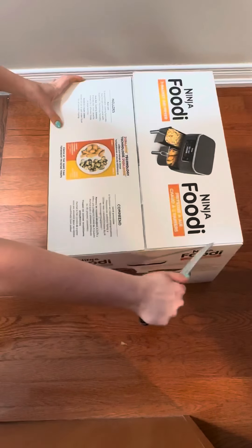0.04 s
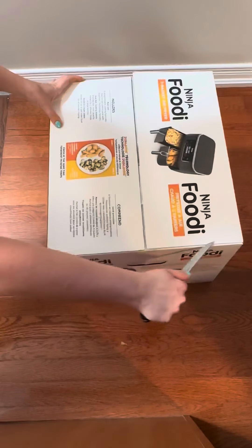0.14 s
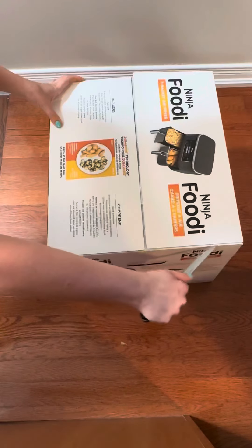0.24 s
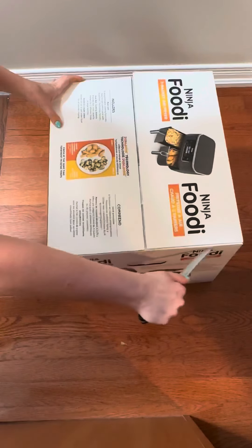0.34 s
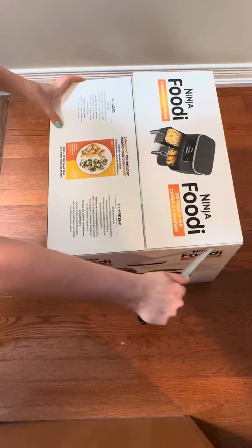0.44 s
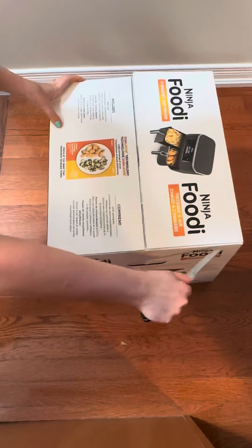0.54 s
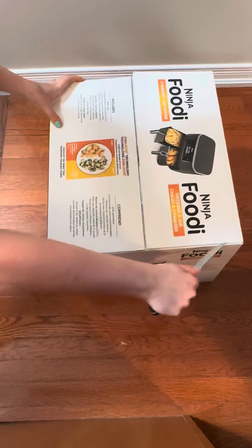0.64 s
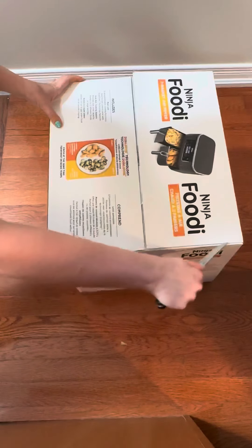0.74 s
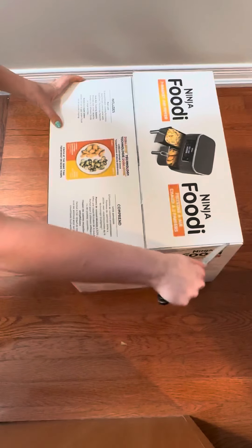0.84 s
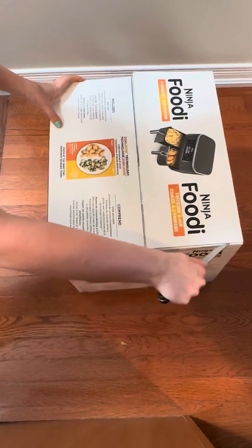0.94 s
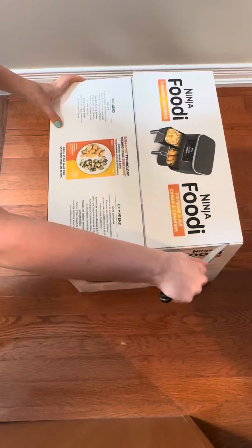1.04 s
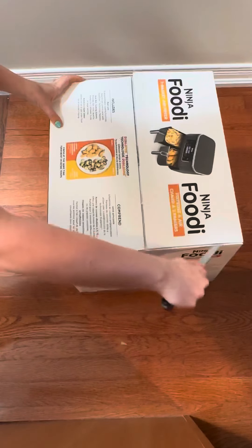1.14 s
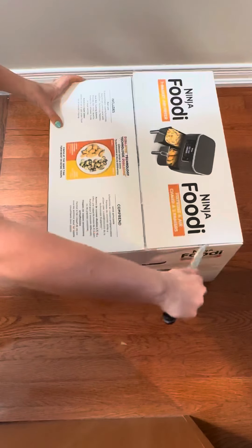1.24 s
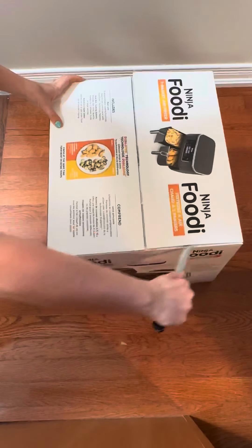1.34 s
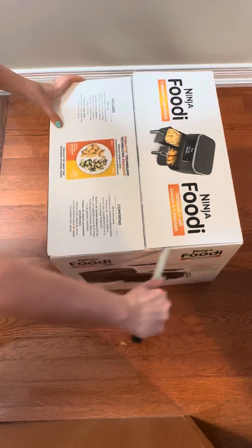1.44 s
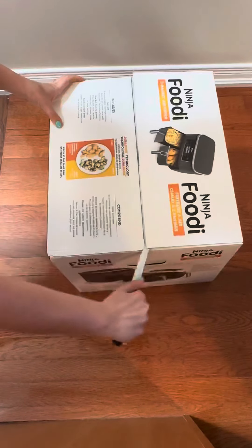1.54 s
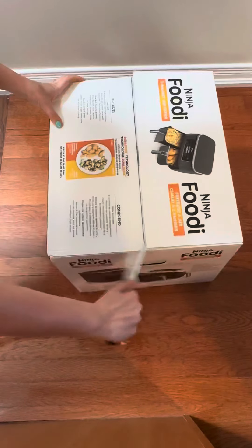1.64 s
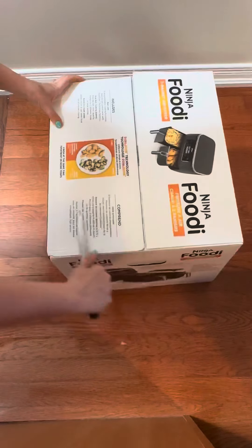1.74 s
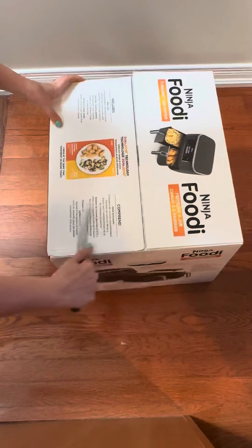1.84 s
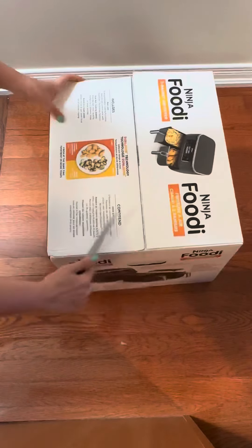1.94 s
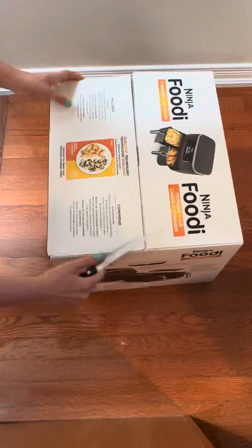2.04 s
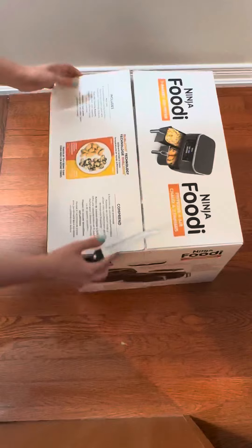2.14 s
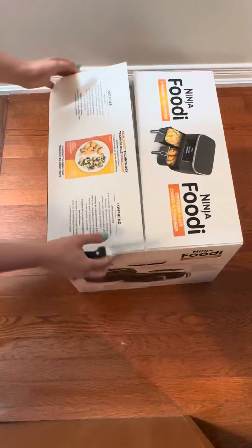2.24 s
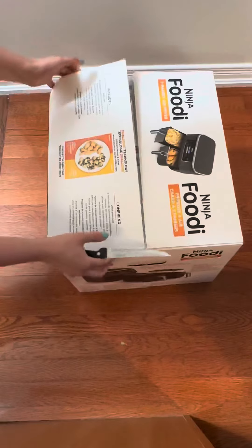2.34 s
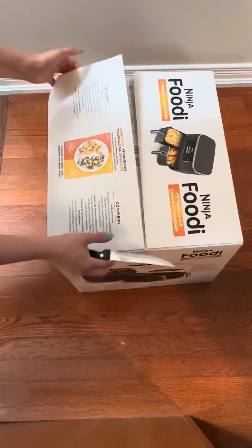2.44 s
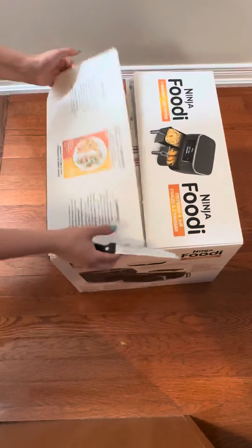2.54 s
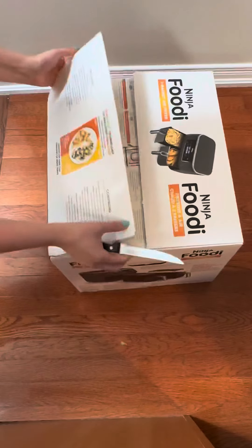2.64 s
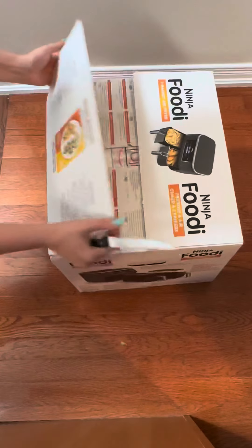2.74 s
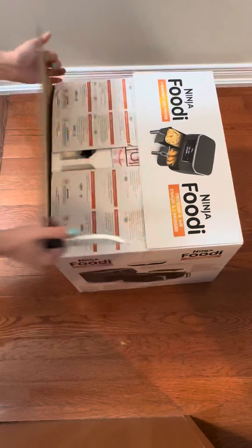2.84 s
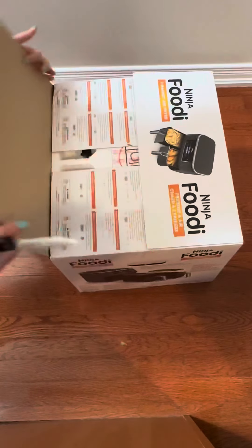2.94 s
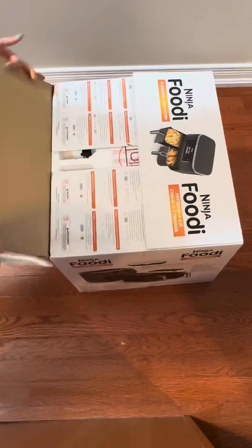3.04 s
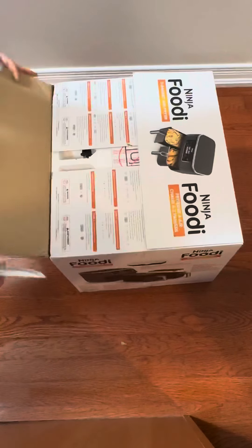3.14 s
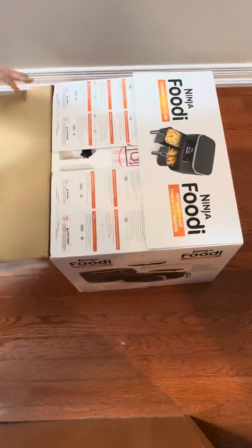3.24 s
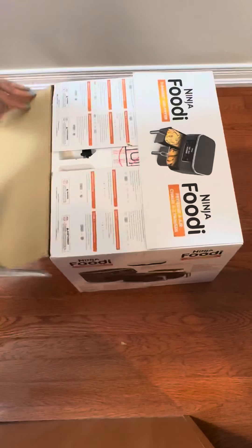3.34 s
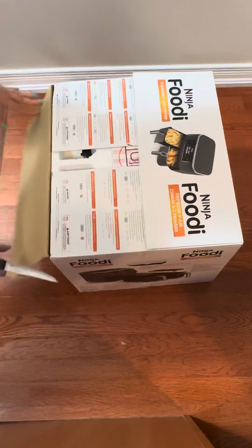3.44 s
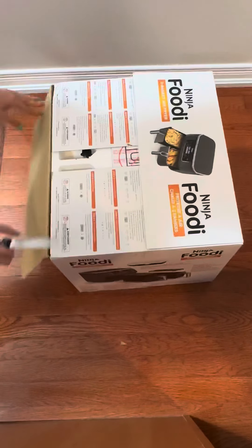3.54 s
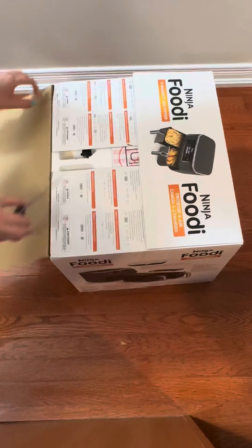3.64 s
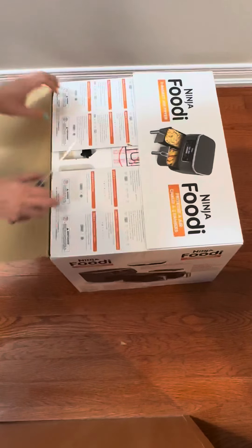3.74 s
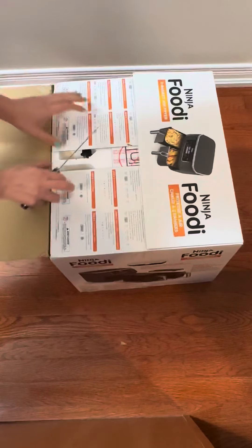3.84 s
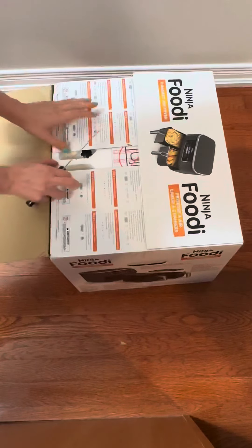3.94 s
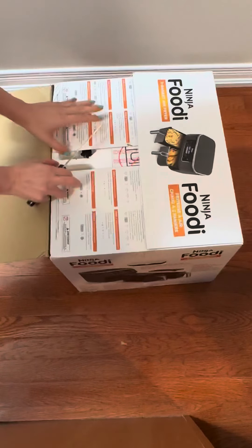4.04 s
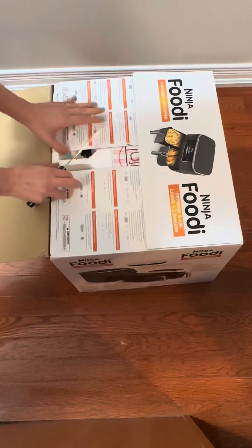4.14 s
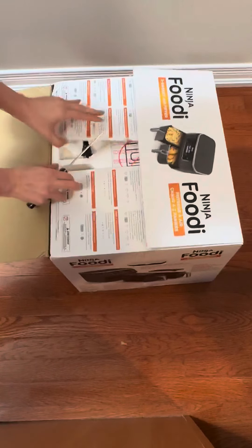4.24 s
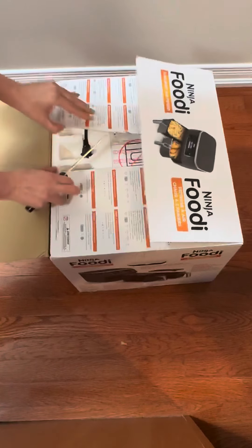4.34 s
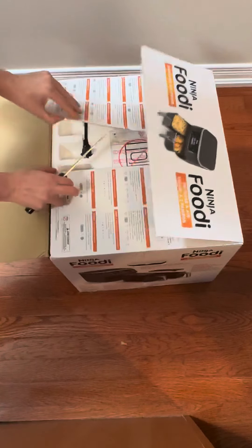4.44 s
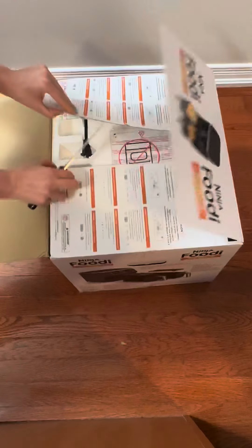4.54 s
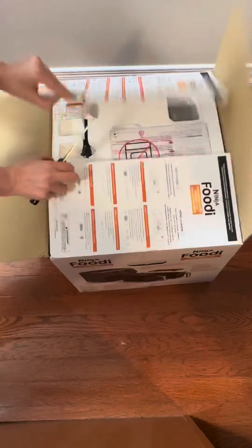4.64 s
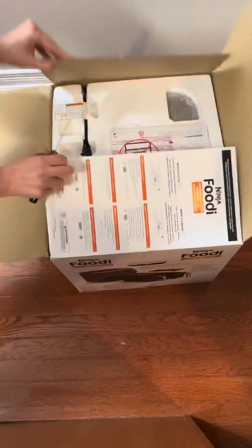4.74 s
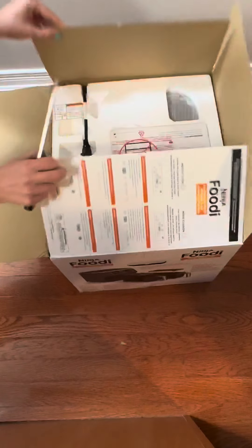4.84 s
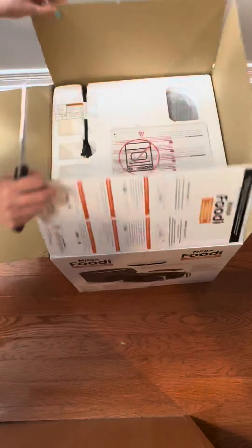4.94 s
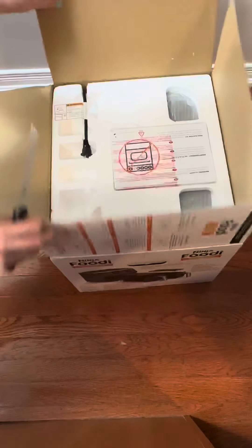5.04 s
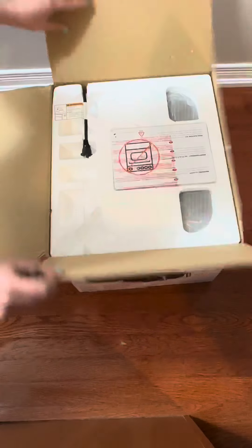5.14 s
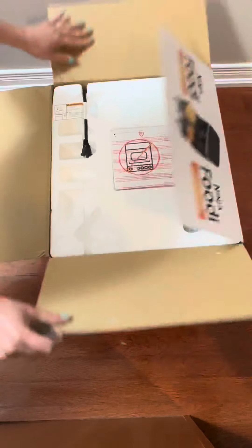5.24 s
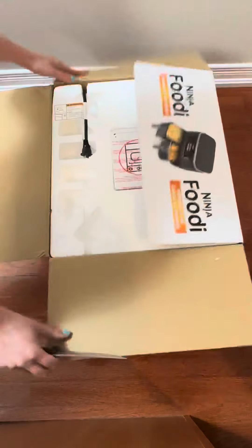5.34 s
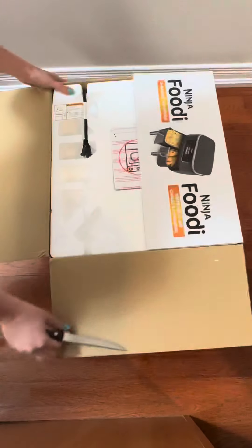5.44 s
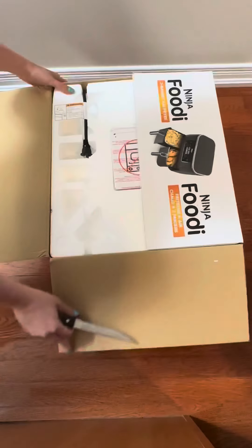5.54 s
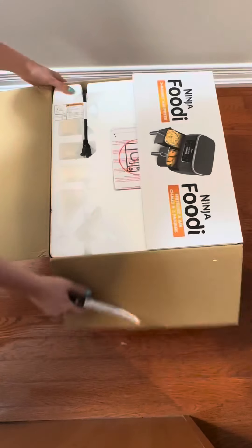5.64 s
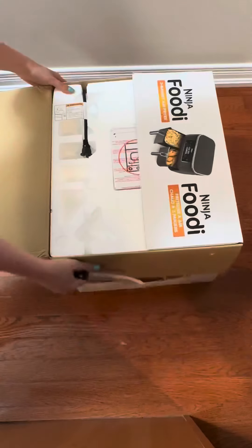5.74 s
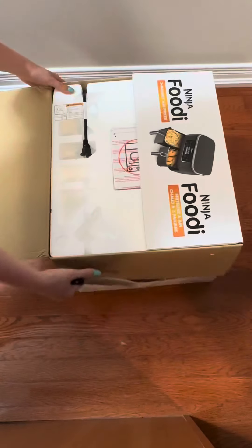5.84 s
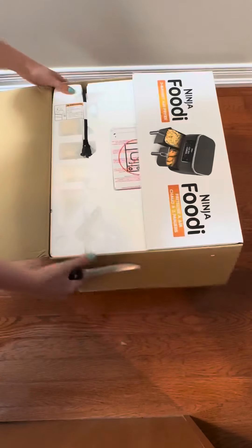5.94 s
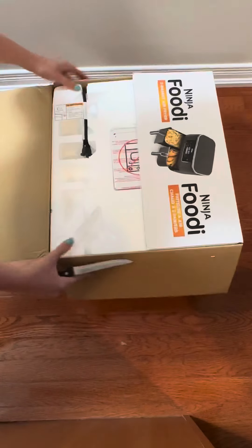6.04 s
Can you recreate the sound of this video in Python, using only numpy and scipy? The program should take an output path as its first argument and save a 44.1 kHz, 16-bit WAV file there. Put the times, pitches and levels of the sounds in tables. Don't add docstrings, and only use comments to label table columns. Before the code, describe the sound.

Close stereo phone pickup in a bare hallway, with a soft low house rumble throughout. For the first second there is little else, only very faint bumps on the box. From about 1.1 s a blade rasps through tape, a dense ringing zip of tiny ticks growing until 1.5 s, where a loud hollow thump lands, followed by smaller knocks and scuffs to 1.9 s. Flaps shift with papery crackles around 2.0-2.3 s, a knock and sharp crack at 2.55-2.6 s, and a deep boxy thud at 2.95 s. Softer bumps and rubbing continue from 3.1 to 4.3 s, fairly quiet. Scrapes swell near 4.6 s, then a strong hollow double knock at 4.8-4.9 s opens a busy cluster of bright snaps, creaks and heavy rubbing through 5.2 s. More thuds and dry pops come at 5.3-5.75 s, ending with a bump, crackle and rising scrape around 6 s.

```python
import sys
import numpy as np
from scipy import signal
from scipy.fft import rfft, irfft, next_fast_len
from scipy.io import wavfile
from scipy.ndimage import uniform_filter1d

SR = 44100
rng = np.random.default_rng(int(sys.argv[2]) if len(sys.argv) > 2 else 0)


def transcribe(signal):
    frames = np.atleast_2d(signal).T
    limited = np.clip(frames, -1, 1)
    pcm = np.round(limited * 32767).astype(np.int16)
    wavfile.write(sys.argv[1], SR, pcm)


N = 269010
T = np.arange(N) / SR

# t/s, body level/dB, boom level/dB, knock level/dB, main mode f/Hz
BLOWS = [(0.037, -49, -48, -64, 180), (0.35, -43, -46, -64, 252), (0.766, -50, -45, -58, 244),
         (1.548, -13, -30, -27, 411), (1.661, -28.5, -51, -42, 222), (1.739, -26.5, -70, -40, 403),
         (1.821, -28, -48, -49, 394), (1.907, -34, -53, -43, 253), (2.196, -31.5, -34, -36.5, 404),
         (2.552, -21, -26, -26.5, 281), (2.945, -15, -19, -32.5, 235), (3.106, -34, -31, -48, 229),
         (3.281, -24, -27, -44, 349.6), (3.648, -36, -62, -39.5, 272), (3.893, -28, -65, -40, 541),
         (4.226, -45, -48, -47, 700), (4.801, -12, -22, -20, 368), (4.878, -18, -43, -26, 514),
         (5.011, -28, -46, -31, 512), (5.29, -18, -34, -22, 237), (5.393, -21.5, -28, -21, 354),
         (5.631, -30, -41, -29.5, 240), (5.75, -27, -31, -31.5, 330), (5.975, -27, -37.5, -30, 283)]
# t/s, level/dB, ringing f/Hz
TAPE_TEETH = [(1.1218, -51, 2650), (1.19, -50, 2400), (1.222, -46, 2100), (1.317, -40, 3100),
              (1.345, -37, 3100), (1.39, -36, 2600), (1.412, -35, 2600), (1.517, -36, 2600),
              (1.1453, -52.5, 2120), (1.1744, -51, 2530), (1.2062, -46, 2060), (1.2316, -41.5, 2080),
              (1.2513, -38, 2240), (1.265, -42, 2280), (1.284, -36, 2580), (1.301, -36.5, 2500),
              (1.3329, -31.5, 2600), (1.3573, -33, 2070), (1.3798, -30, 2040), (1.4006, -30, 3200),
              (1.425, -32, 3150), (1.442, -26, 3100), (1.461, -37, 3150), (1.48, -30, 2570),
              (1.5015, -31, 2010)]


def undb(db):
    return np.exp(np.asarray(db) * (np.log(10) / 20))


def at(table, hz):
    f, v = np.transpose(table)
    return np.interp(np.log(hz), np.log(np.maximum(f, 1)), v)


def unit(x):
    return x / np.sqrt(np.mean(x ** 2))


def band(x, lo_hz, hi_hz):
    sos = signal.butter(2, [lo_hz, min(hi_hz, .49 * SR)], "bandpass", fs=SR, output="sos")
    return signal.sosfilt(sos, x)


def walk(rate):
    k = int(SR / rate)
    held = np.repeat(rng.standard_normal(N // k + 1), k)
    return 2.28 * uniform_filter1d(uniform_filter1d(held, k), k)[:N]


def add(out, s, x):
    i = max(int(s * SR), 0)
    out[i:i + len(x)] += x[:N - i]


def slips(rate, spread_db):
    hit = rng.random(N) < rate / SR
    size = np.minimum(rng.exponential(size=N), 4)
    return hit * rng.standard_normal(N) * undb(spread_db * size + 2.18 * walk(45))


def effort():
    # t/s, pressure level/dB, speed as brightness level/dB
    blade_path = [
        (1.08, -72, 5),
        (1.16, -61, 0),
        (1.23, -49.5, 0),
        (1.32, -44, 3),
        (1.45, -42, 3),
        (1.53, -46, -0.5),
        (1.64, -54.5, 5),
        (1.74, -46, 2),
        (1.84, -68.5, 4),
    ]
    # t/s, pressure level/dB, speed as brightness level/dB
    hand_path = [(0, -74, -3), (.85, -80, -3), (1.8, -61.5, 1), (2.2, -63, 7.5), (2.5, -53, 1.5),
                 (2.72, -61, 3.5), (2.9, -55, 6), (3.2, -55.5, 5), (3.42, -53, 0), (3.53, -59, -3),
                 (3.8, -67, 2.5), (4.1, -54.5, 1), (4.45, -59, 0.5), (4.8, -50, 3), (5.1, -40.5, -1.5),
                 (5.3, -52.5, 6), (5.9, -62.5, 6), (6.1, -41, -2)]
    drum_rest_db, drum_db, scrape_db = -52.5, 0, -6.5
    hiss_db, hiss_per_speed = -14.5, 2.9
    blade_drum_db = -3
    shudder_s, shudder_drum_db, shudder_board_db = .04, -26, -26.5

    board = scrape = hiss = 0
    for s, press_db, speed_db in (np.transpose(blade_path), np.transpose(hand_path)):
        last_db = press_db[-1] if s[-1] > 6 else -99
        db = np.interp(T, s, press_db, right=last_db)
        db = np.where(T < s[0], -99, db)
        fast = np.interp(T, s, speed_db)
        board = board + undb(db)
        scrape = scrape + undb(db + scrape_db + fast)
        hiss = hiss + undb(db + hiss_db + hiss_per_speed * fast)
    sawing = board * (T < blade_path[-1][0]) * (T > blade_path[0][0])

    shudder, t = np.zeros(N), T[:int(.4 * SR)]
    for s, body_db, *_ in BLOWS:
        add(shudder, s, undb(body_db) * (1 - np.exp(-t / 0.0068)) * np.exp(-t / shudder_s))
    drum = undb(drum_rest_db) + undb(drum_db) * board
    drum = drum + undb(blade_drum_db) * sawing + undb(shudder_drum_db) * shudder
    return drum, board + undb(shudder_board_db) * shudder, scrape, hiss


def rubbing():
    # f/Hz, half width/Hz, level/dB
    board_modes = [(2090, 350, 32.5), (2610, 45, 26), (3174, 190, 8), (4130, 57, -24), (4930, 93, -35),
                   (5050, 210, -58.5)]
    drum, board, scrape, hiss = effort()
    grain, other = slips(6000, 2.5), slips(5000, 2.5)
    ringing = sum(undb(db) * np.sqrt(400 / w) * band(grain, f - w, f + w) for f, w, db in board_modes)
    hollow = unit(band(slips(1500, 2.5), 90, 320))
    stiff = unit(band(other, 680, 1300))
    rough = unit(band(other, 1300, 4500))
    skin = unit(band(slips(12000, 2.0), 5000, 18000))
    out = drum * hollow
    out += board * (unit(band(grain, 299, 690)) + undb(-3.5) * stiff)
    out += scrape * unit(rough + .5 * unit(ringing))
    return out + hiss * skin * 1.3


def blade():
    # f/Hz, half width/Hz, level/dB
    blade_modes = [(2060, 110, 0), (2580, 110, 0), (3170, 120, 0), (6400, 400, -6)]
    ring_db, ring_s = -8, .007
    push, t = np.zeros(N), T[:int(.05 * SR)]
    for s, db, _ in TAPE_TEETH:
        add(push, s - .001, undb(db + ring_db) * (1 - np.exp(-t / .0015)) * np.exp(-t / ring_s))
    shake = rng.standard_normal(N)
    modes = sum(undb(db) * unit(band(shake, f - w, f + w)) for f, w, db in blade_modes)
    return push * modes / 2


def brushes():
    # t/s at the top, level/dB, centre f/Hz, skin hiss level/dB, length/s
    slow_strokes = [(.215, -70, 5400, -84, .016), (1.546, -29, 2900, -16.5, 0.0059),
                    (1.73, -47, 2300, -47, .015), (2.048, -50.5, 1850, -47.5, 0.017),
                    (2.431, -46, 2080, -40.5, 0.029), (3.37, -48, 2000, -56, .02),
                    (3.64, -52, 1500, -52, .022), (3.625, -55, 5500, -70, .022),
                    (4.185, -50, 3020, -62, 0.018), (4.595, -44, 2030, -55, .035),
                    (4.634, -33, 2100, -28, 0.022), (4.65, -30, 520, -61, .045),
                    (4.62, -39, 1700, -60, .035), (4.63, -33, 850, -60, .045), (1.72, -41, 890, -54, 0.028),
                    (5.035, -35.5, 2140, -24, 0.029), (2.43, -48, 830, -70, 0.037),
                    (3.13, -51, 2600, -50, .03), (2.2, -62, 2700, -45, 0.028)]
    quick_scuffs = [(.905, -69, 4100, -90, .05), (5.018, -33, 1400, -60, .015), (4.08, -50, 1000, -70, .03),
                    (3.24, -46, 850, -70, .03), (1.672, -35, 2400, -33.5, 0.016),
                    (1.71, -37, 2300, -40, .025), (1.715, -39, 1100, -60, .02),
                    (2.529, -62, 2500, -42, 0.013), (3.225, -45, 2000, -57, 0.033),
                    (3.07, -45, 1900, -66, .01), (3.178, -43, 1900, -60, .01), (3.36, -47, 1900, -60, .03),
                    (2.575, -36, 1100, -60, .04), (5.77, -40, 1100, -60, .03), (5.49, -35, 380, -70, .04),
                    (5.42, -32, 900, -70, .03), (3.923, -50.5, 1900, -50, 0.045),
                    (4.095, -53.5, 1820, -50.5, .054), (2.15, -46, 1610, -65, .02),
                    (4.32, -58, 1960, -54, 0.078), (5.09, -37.5, 2950, -51, 0.043),
                    (5.19, -39, 3000, -31, .019), (5.44, -35, 1580, -55, .016),
                    (5.476, -38, 2500, -26, 0.022), (5.647, -41.5, 2170, -29, 0.012),
                    (6.014, -41, 2740, -41.5, 0.026), (4.926, -39, 2480, -40, 0.027),
                    (1.58, -56, 2500, -46, .04), (4.885, -28, 520, -57, .06), (4.83, -21, 520, -60, .03),
                    (4.82, -26, 1250, -50, .05), (5.428, -38, 606, -60, 0.06),
                    (5.52, -44, 1200, -44, 0.046)]
    slow_rise, quick_rise = 0.97, 0.36
    lead_s = .15
    out, t = np.zeros(N), T[:int(.4 * SR)] - lead_s
    grain = slips(7000, 2.0)
    skin = unit(band(slips(14000, 1.5), 6000, 18000))
    strokes = [(*row, slow_rise) for row in slow_strokes] + [(*row, quick_rise) for row in quick_scuffs]
    for s, db, hz, skin_db, fall, share in strokes:
        rise = share * fall
        swell = np.exp(-(t / max(rise, .002)) ** 2 / 2)
        stroke = np.where(t < 0, swell, np.exp(-t / max(fall, .002)))
        i = int((s - lead_s) * SR)
        cut = slice(i, i + len(t))
        board = unit(band(grain[cut], hz / 1.82, hz * 1.26))
        add(out, s - lead_s, stroke[:len(board)] * (undb(db) * board + undb(skin_db) * skin[cut]))
    return out


def knocks():
    # f/Hz, level/dB
    box_modes = [(45, -8), (62, 2.5), (81, 4.5), (105, 0.5), (135, 0), (165, -3), (195, 1), (233, 4),
                 (290, 0.5), (359, 1), (420, -1.5), (480, -1), (540, -2), (617, 2), (705, -0.5),
                 (790, -0.5), (887, 2), (1049, 0.5), (1210, 0), (1367, 1.5), (1540, -1.5), (1650, 2),
                 (1838, 3), (2000, -1), (2231, -11), (2500, -2.5), (2776, 0.5), (3150, -5.5), (3600, -8),
                 (4200, -13.5)]
    lag_cycles = 1.6
    knock_fade_db = 4.6
    out, t = np.zeros(N), T[:int(.22 * SR), None].astype(np.float32)
    box_hz, box_db = np.transpose(box_modes)
    chance = rng.standard_normal((len(BLOWS), 3, len(box_modes)))
    end = np.clip((.22 - t) / .04, 0, 1)
    for (s, body_db, boom_db, knock_db, main_hz), (bend, size, turn) in zip(BLOWS, chance):
        hz = np.append(box_hz * (1 + 0.022 * bend), main_hz)
        shape = [(45, boom_db - 18), (85, boom_db - 6.5), (330, body_db - 10.0),
                 (1300, knock_db - 6.0), (4200, knock_db - 16.5)]
        db = np.append(at(shape, hz[:-1]) + box_db + 3 * size, body_db - 3.0)
        fall_db = 100 * knock_fade_db * (hz / 330) ** 0.5 * np.maximum(t - lag_cycles / hz, 0)
        swell = end * (1 - np.exp(-(t * hz / lag_cycles) ** 2 * 1.5))
        phase = 2 * np.pi * (hz * t - lag_cycles * np.log(hz)) + np.append(turn, 0) * .85
        modes = swell * undb(-fall_db) * np.sin(phase)
        add(out, s - .0012, modes @ undb(db - 1.8))
    return out


def tears():
    # t/s, level/dB, dull part level/dB, ringing f/Hz
    crease_cracks = [(2.027, -47, -37, 2950), (2.137, -35.5, -30.5, 2000), (2.2687, -39.5, -38, 2610),
                     (2.596, -22.5, -23, 3050), (2.89, -45, -39, 2840), (3.0687, -39, -37, 2090),
                     (3.1774, -35, -34.5, 7000), (3.3543, -52, -37, 2330), (3.5985, -44, -41, 1200),
                     (4.0193, -46.5, -44, 2640), (4.2812, -44, -56, 7000), (4.8474, -35.5, -36, 2110),
                     (4.911, -23.5, -30, 2750), (4.9425, -27, -25, 2760), (4.951, -31, -29, 2500),
                     (4.999, -26.5, -45, 2030), (5.1795, -24, -29, 5940), (5.186, -26, -33, 6200),
                     (5.049, -30, -27, 1200), (5.098, -36, -32, 1500), (3.134, -50, -40, 1600),
                     (4.82, -36, -24, 1400), (4.836, -38, -27, 1300), (2.61, -38, -32, 1500),
                     (5.6614, -30, -30, 6990), (5.672, -34, -29, 3780), (5.696, -33, -33, 1300),
                     (6.0023, -40, -41, 2730), (6.0136, -32, -36, 2720), (6.053, -33, -42, 2760),
                     (6.0744, -34, -44, 2620)]
    # t/s, level/dB, dull part level/dB
    first_touches = [(0.0373, -62, -55), (0.349, -65, -54), (0.7647, -76, -61), (1.6576, -32, -44),
                     (1.909, -66, -40), (2.1942, -30.5, -23.5), (2.5496, -22, -19), (2.9437, -44, -31),
                     (3.2779, -47, -39), (4.8005, -32, -26), (4.808, -25, -15), (4.8763, -30, -33),
                     (5.2854, -47, -18.5), (5.3906, -44, -28), (5.6328, -27, -33), (5.7504, -26, -28),
                     (5.975, -33.5, -25.5)]
    # t/s, level/dB, ringing f/Hz
    glue_snaps = [(1.3797, -38, 9000), (1.6576, -32, 9500), (4.8083, -29, 8000), (4.9415, -17, 5000),
                  (5.347, -30, 7250), (5.3657, -26, 7360), (5.4171, -24, 7430), (5.4515, -26, 9900),
                  (5.46, -26, 9900), (5.4679, -27, 5400), (5.6321, -27, 6770), (5.6949, -31, 6850),
                  (5.7508, -33, 9000), (5.9583, -42, 6030), (3.882, -52, 2500), (.237, -66, 3500),
                  (2.279, -46, 2700), (4.106, -50, 3500)]
    tooth_dull_db, tooth_fade_db = -6, 10
    slap_hz, slap_fade_db = 2374, 6.5
    snap_gain_db, snap_dull_db, snap_fade_db = 3.5, -14, 22
    crack_fade_db = 9
    teeth = [(s, db, db + tooth_dull_db, hz, tooth_fade_db) for s, db, hz in TAPE_TEETH]
    slaps = [(*row, slap_hz, slap_fade_db) for row in first_touches]
    snaps = [(s, db + snap_gain_db, db + snap_dull_db, hz, snap_fade_db) for s, db, hz in glue_snaps]
    return teeth + slaps + snaps + [(*row, crack_fade_db) for row in crease_cracks]


def cracks():
    bright, dull, ring = np.zeros((3, N))
    t = T[:int(.06 * SR)]
    fibres = rng.standard_normal((3, N + len(t)))
    for s, db, dull_db, hz, fade_db in tears():
        fade = undb(-200 * max(fade_db, 1) * t) + 0.059 * np.exp(-t / 0.024)
        puff = (1 - np.exp(-t / 0.001)) * fade
        add(bright, s - .0012, undb(db - 1.5) * puff)
        add(dull, s - .0012, undb(dull_db - 5) * puff)
        patch = unit(band(fibres[2, int(s * SR):][:len(t)], hz * .95, hz * 1.05))
        add(ring, s - .0012, undb(db - 10) * puff * patch)
    bright_noise = unit(band(fibres[0, :N], 2800, 18000))
    dull_noise = unit(band(fibres[1, :N], 900, 3000))
    return bright * bright_noise + dull * dull_noise + ring


def creaks():
    # t/s, length/s, level/dB, start f/Hz, end f/Hz
    box_tones = [(1.71, 0.055, -33, 431, 421), (1.89, .12, -69, 3950, 3850), (2.942, .035, -26, 490, 470),
                 (2.376, .03, -51, 1655, 1660), (2.403, 0.05, -52, 1900, 2030),
                 (2.376, 0.05, -58, 2900, 2950), (2.945, 0.11, -32, 49.7, 42),
                 (4.931, 0.058, -32, 560, 598), (5.01, 0.036, -25.5, 530, 519),
                 (5.02, 0.06, -37.5, 2600, 3240), (5.295, 0.066, -32.5, 624, 796),
                 (5.311, 0.09, -32, 290.6, 313), (5.394, .05, -28.5, 344, 348),
                 (5.464, 0.035, -41, 746, 750), (5.993, .07, -46.5, 2750, 2760),
                 (3.286, .03, -24.5, 105, 92), (3.31, .05, -35, 95, 90), (2.98, .045, -27, 85, 72),
                 (2.558, .04, -30, 135, 125), (4.81, .045, -24, 365, 355), (4.805, .025, -29, 1061, 1050),
                 (5.39, .025, -32, 1640, 1630), (5.428, .028, -39, 1310, 1310),
                 (5.43, .025, -41, 1650, 1650), (5.52, .055, -51, 1780, 1820),
                 (5.525, .045, -53, 1930, 1960), (3.642, .022, -43, 610, 600),
                 (3.635, .02, -49, 1350, 1360), (3.355, .025, -45, 640, 680),
                 (4.575, .05, -44, 1780, 1720), (4.6, .045, -45, 2280, 2220), (4.6, .045, -40, 720, 770),
                 (4.65, .05, -40, 360, 340), (4.665, .075, -46, 680, 740), (2.47, .018, -39, 245, 235),
                 (2.14, .04, -49, 1620, 1500), (5.64, .04, -37, 230, 215), (5.749, .016, -26, 640, 610),
                 (3.281, .012, -29, 360, 280), (4.876, .02, -27, 620, 520), (1.548, .018, -22, 400, 260),
                 (.89, .1, -75, 3500, 3600), (1.575, .07, -35, 250, 240)]
    out = np.zeros(N)
    slow = signal.butter(2, 60, fs=SR, output="sos")
    shake = unit(signal.sosfilt(slow, rng.standard_normal((2, N))))
    for s, length, db, from_hz, to_hz in box_tones:
        u = np.linspace(0, 1, int(max(length, .01) * SR))
        turn = 2 * np.pi * np.cumsum(from_hz + (to_hz - from_hz) * u) / SR
        a, b = shake[:, int(s * SR):][:, :len(u)]
        u, turn = u[:len(a)], turn[:len(a)]
        stroke = np.sqrt(np.clip(np.sin(np.pi * u ** 0.45), 0, 1))
        add(out, s, undb(db) * stroke * ((1 + 0.69 * a) * np.sin(turn) + 0.59 * b * np.cos(turn)))
    return out


def hallway(x):
    # f/Hz, t60/s
    decay = [(100, 0.25), (500, 0.19), (2000, 0.42), (8000, 0.24), (16000, .15)]
    # f/Hz, level/dB
    wet = [(100, -26), (300, -13), (640, -1), (1100, -3), (1600, -6.5), (4000, -2), (7000, -5)]
    t, out = T[:int(.4 * SR)], []
    for _ in range(2):
        tail = 0
        for hz in 90 * 2. ** np.arange(7):
            part = band(rng.standard_normal(len(t)), hz / np.sqrt(2), hz * np.sqrt(2))
            fade = np.exp(-np.log(1000) * t / at(decay, hz)) * np.clip(t / 0.011 - .5, 0, 1)
            tail = tail + undb(at(wet, hz)) * part * fade / np.sqrt(np.sum(fade ** 2))
        spec = rfft(tail)
        even = uniform_filter1d(np.abs(spec), size=41)
        tail = irfft(spec * 1.3 * even / (np.abs(spec) + .4 * even), len(t))
        tail = tail * np.clip(t / .006, 0, 1) * np.clip(2 - t / .15, 0, 1) ** 2
        out.append(signal.oaconvolve(x, tail)[:N])
    return np.array(out)


def house():
    # f/Hz, level per Hz/dB
    spectrum = [(12, -31.5), (20, -11.5), (69, -2.5), (102, -9.5), (145, 2), (205, -24), (291, -13),
                (401, -46), (483, -18.5), (742, -40.5), (1080, -31), (1170, -34), (12000, -68),
                (15600, -110), (22000, -120)]
    # f/Hz, correlation/1
    likeness = [(60, 0.98), (130, 0.99), (290, 0.88), (640, 0.18), (1410, 0.01), (3100, 0.28), (6820, 0.16),
                (15000, -0.72)]
    hz = np.maximum(np.fft.rfftfreq(N, 1 / SR), 1)
    alike = np.clip(at(likeness, hz), -1, 1)
    noise = rfft(rng.standard_normal((2, N))) * undb(at(spectrum, hz))
    mid, side = noise * np.sqrt([1 + alike, 1 - alike])
    mid, side = irfft(mid, N), irfft(side, N)
    level_db = -46.5 + 1.0 * walk(4) + np.array([[.6], [-.6]])
    return np.array([mid + side, mid - side]) / np.std(mid) * undb(level_db)


def scene():
    # f/Hz, phase/rad
    left_lead = [(4000, 0), (6500, -.9), (9000, -1.9), (10900, -2.95), (13600, -3.3), (15500, -4.4)]
    # f/Hz, level/dB
    port_tilt = [(60, 1), (200, 1.5), (500, 2.5), (1300, 0), (16000, 0)]
    box = knocks() + cracks() + brushes() + creaks() + rubbing() + blade()
    size = next_fast_len(N + 4096)
    hz = np.maximum(np.fft.rfftfreq(size, 1 / SR), 1)
    half = undb(at(port_tilt, hz) / 2) * np.exp(.5j * at(left_lead, hz))
    ports = irfft(rfft(box, size) * np.array([half, 1 / half]), size)[:, :N]
    return ports + hallway(box) + house()


def top_cut(x):
    return signal.sosfilt(signal.butter(12, 16970, fs=SR, output="sos"), x)


def record(dry):
    x = signal.sosfilt(signal.butter(2, 35, "highpass", fs=SR, output="sos"), dry)
    x = signal.sosfilt(signal.ellip(10, .2, 70, 15700, fs=SR, output="sos"), x)
    return top_cut(x)


dry = scene()
out = record(dry)
transcribe(out)
```